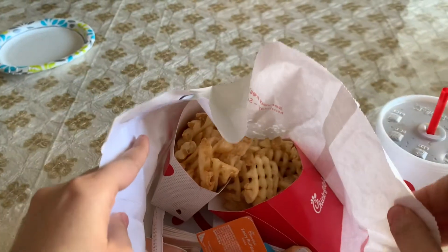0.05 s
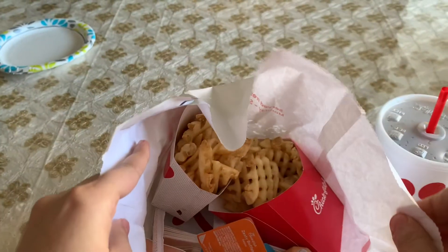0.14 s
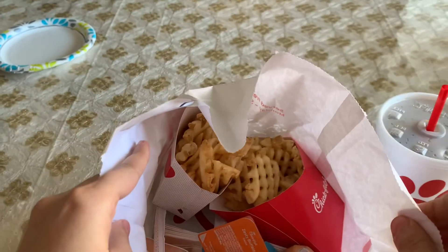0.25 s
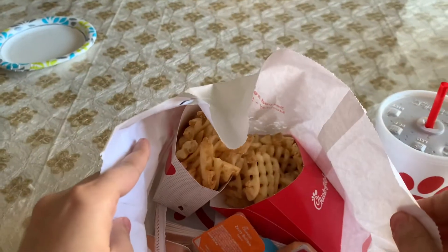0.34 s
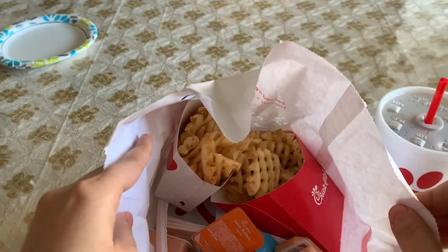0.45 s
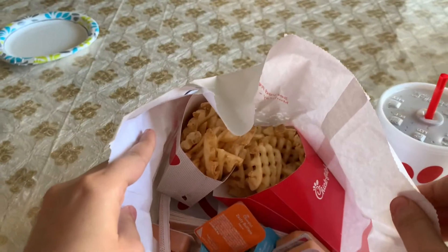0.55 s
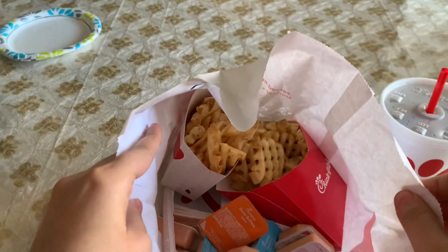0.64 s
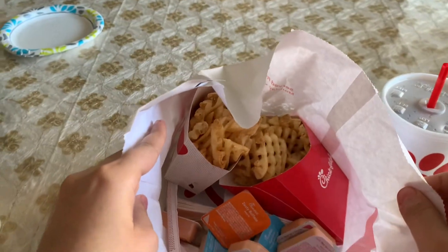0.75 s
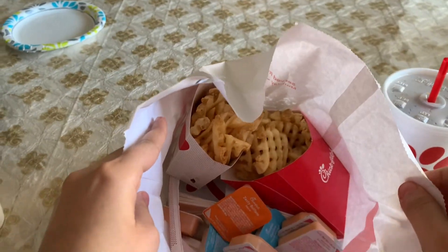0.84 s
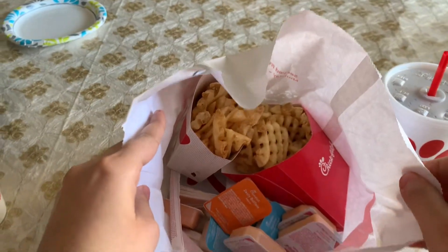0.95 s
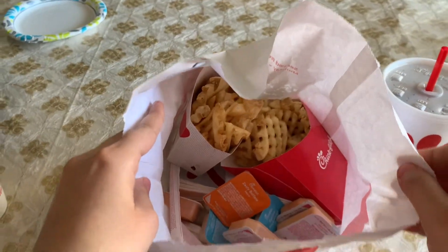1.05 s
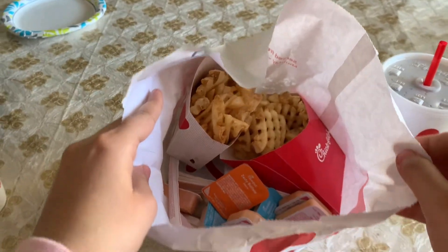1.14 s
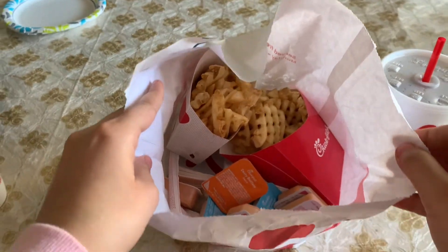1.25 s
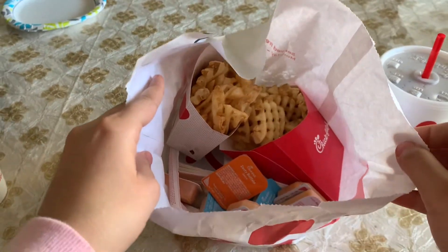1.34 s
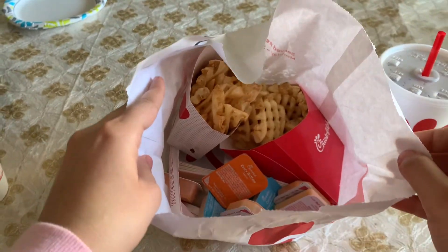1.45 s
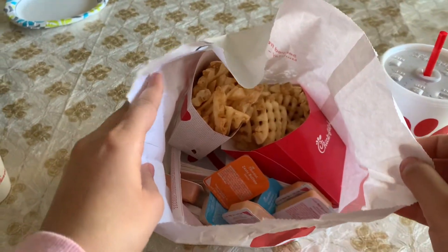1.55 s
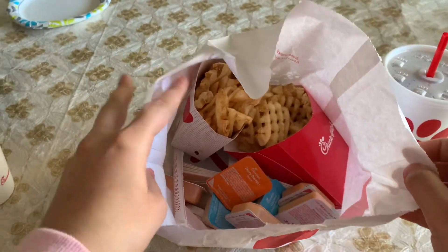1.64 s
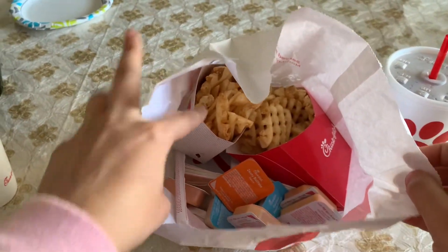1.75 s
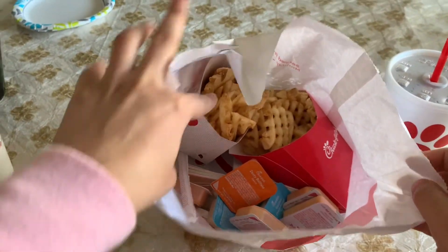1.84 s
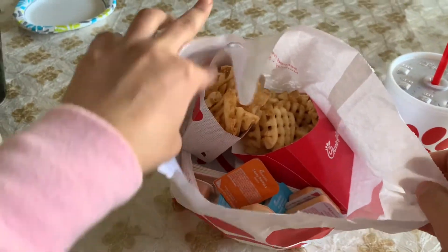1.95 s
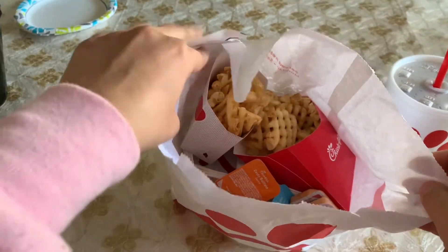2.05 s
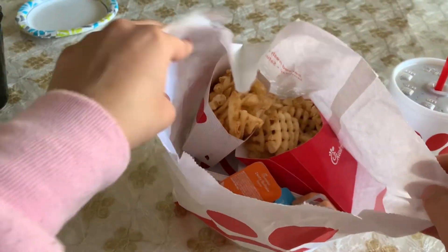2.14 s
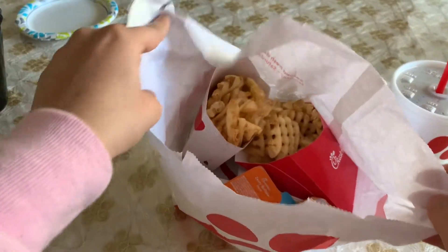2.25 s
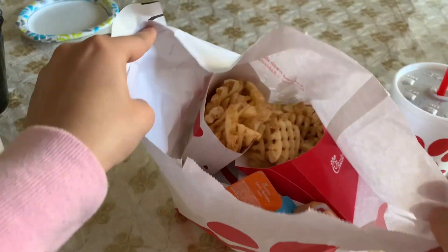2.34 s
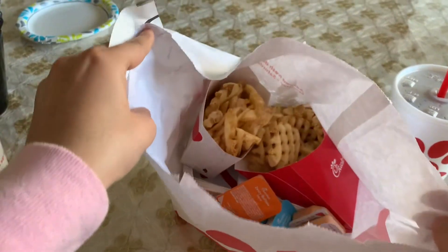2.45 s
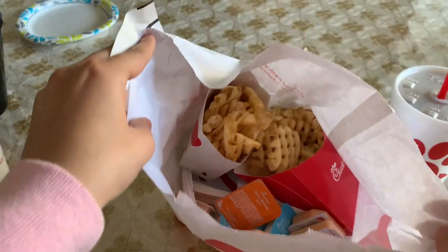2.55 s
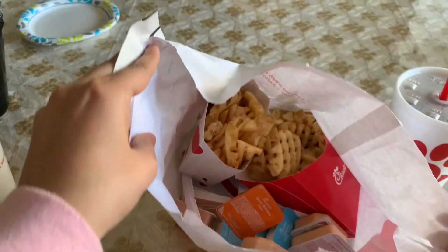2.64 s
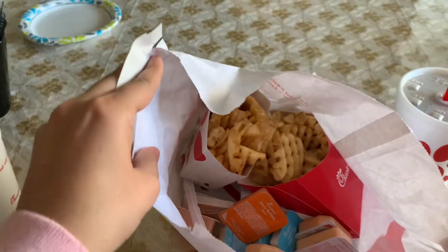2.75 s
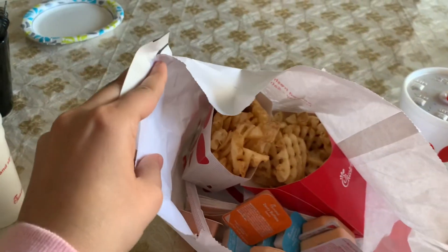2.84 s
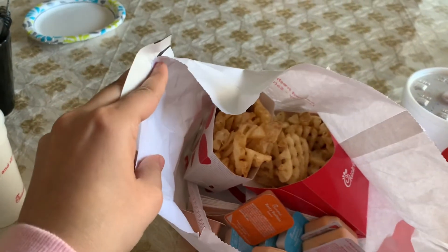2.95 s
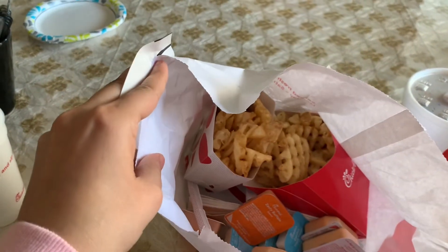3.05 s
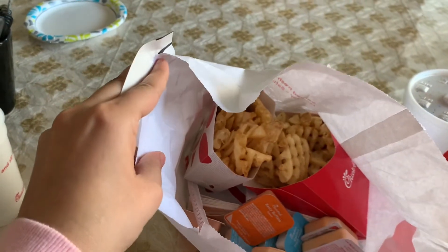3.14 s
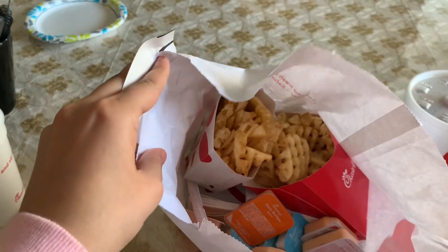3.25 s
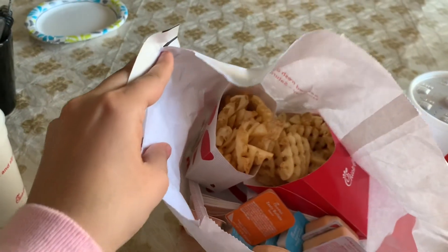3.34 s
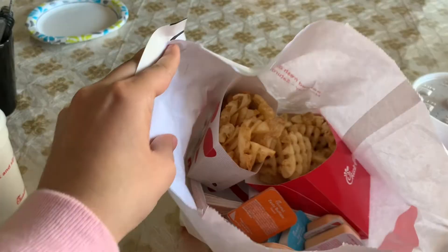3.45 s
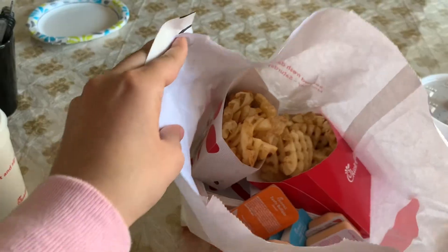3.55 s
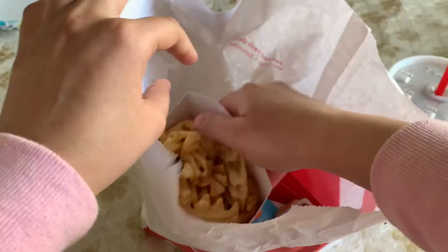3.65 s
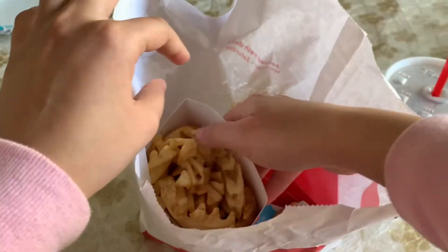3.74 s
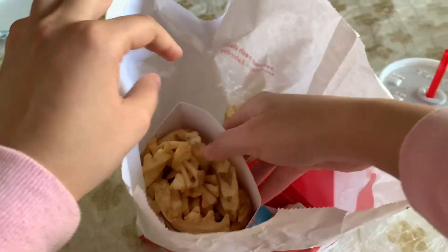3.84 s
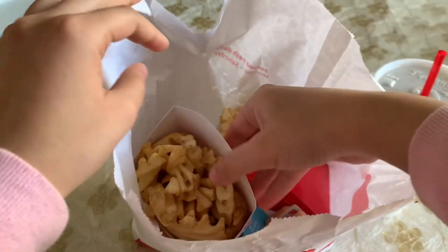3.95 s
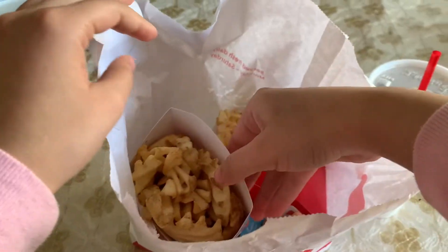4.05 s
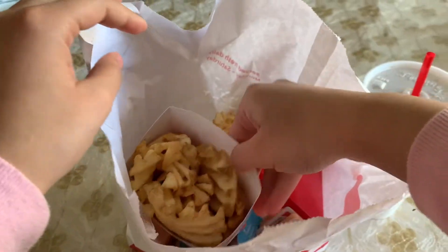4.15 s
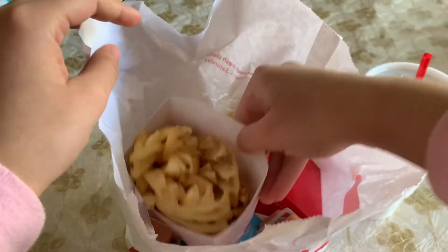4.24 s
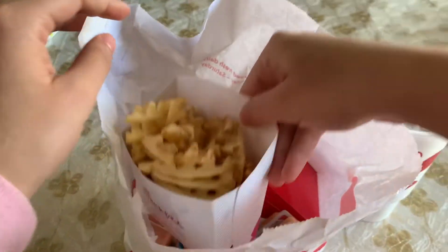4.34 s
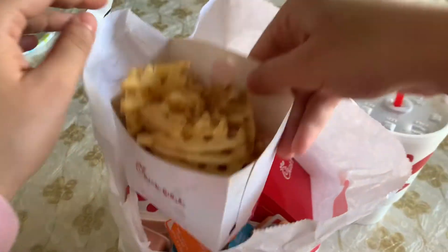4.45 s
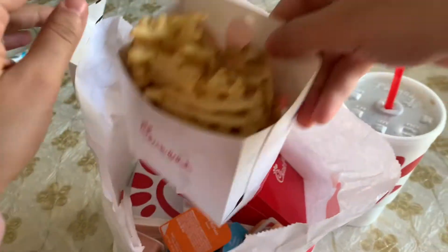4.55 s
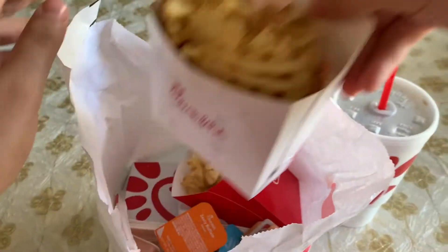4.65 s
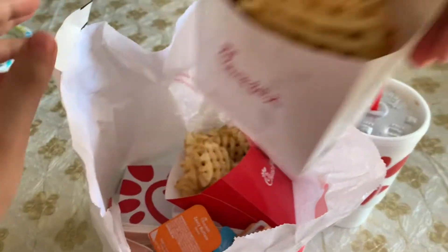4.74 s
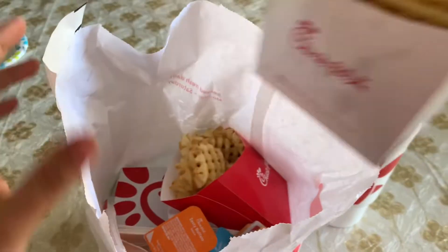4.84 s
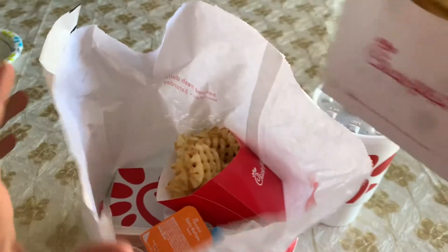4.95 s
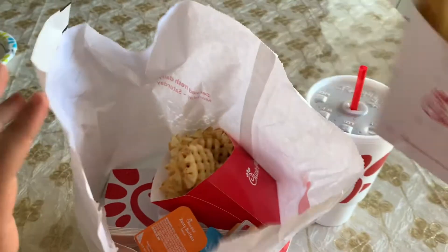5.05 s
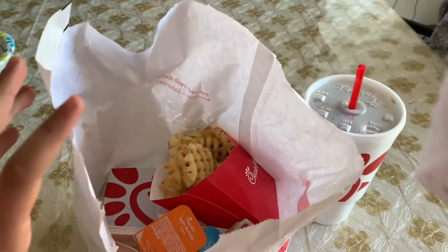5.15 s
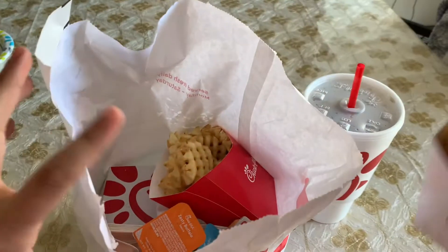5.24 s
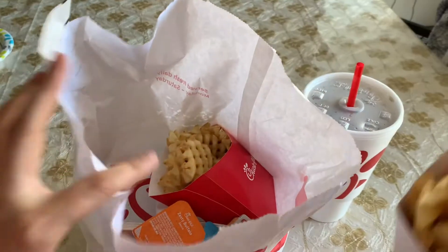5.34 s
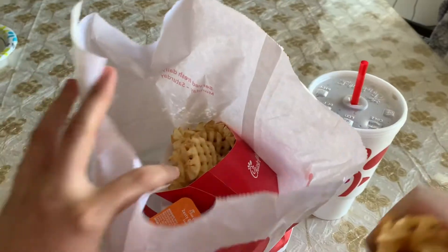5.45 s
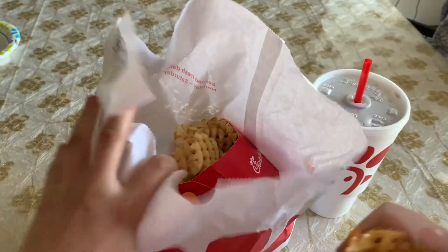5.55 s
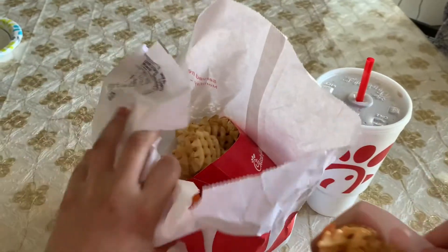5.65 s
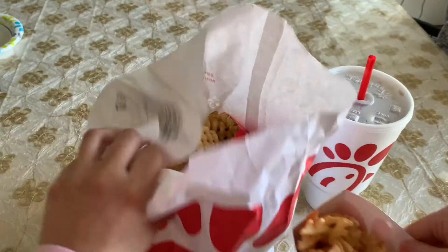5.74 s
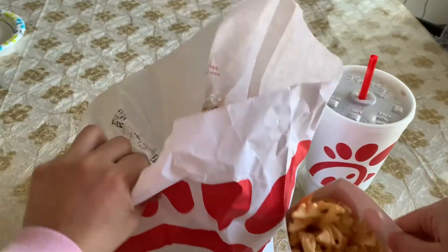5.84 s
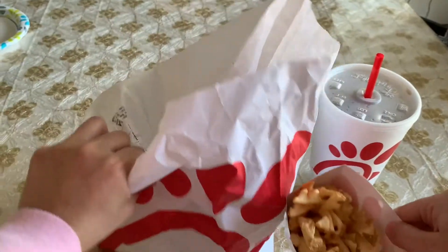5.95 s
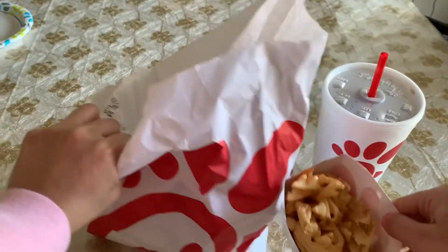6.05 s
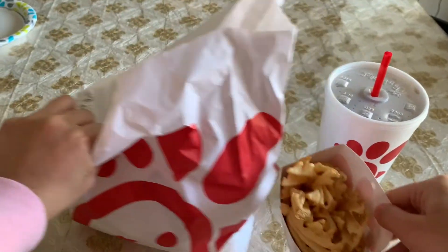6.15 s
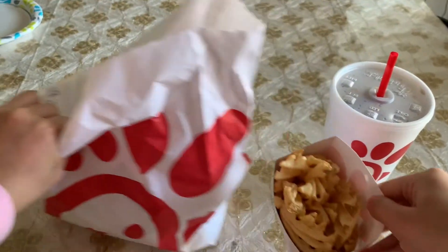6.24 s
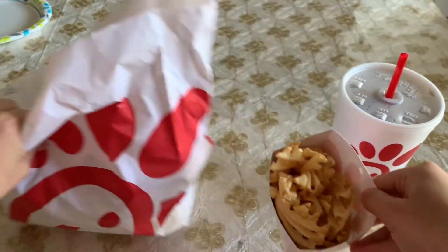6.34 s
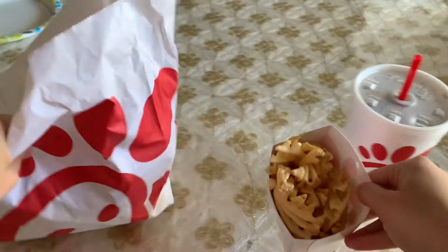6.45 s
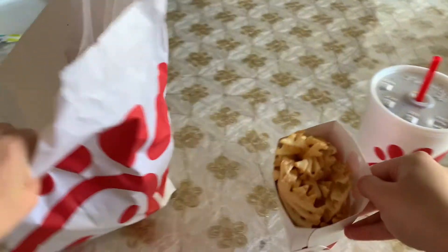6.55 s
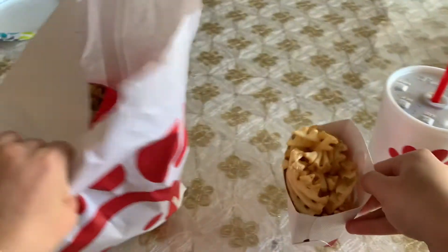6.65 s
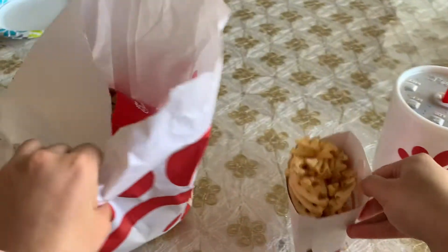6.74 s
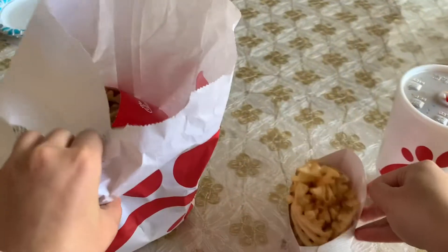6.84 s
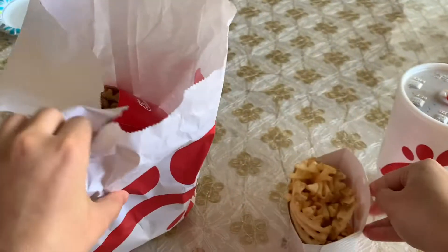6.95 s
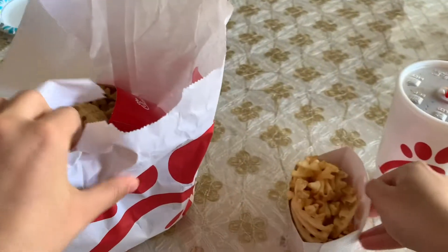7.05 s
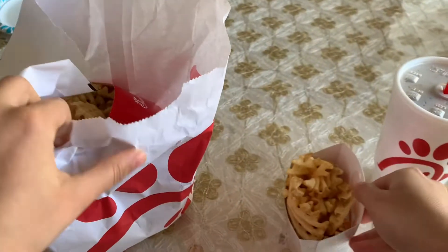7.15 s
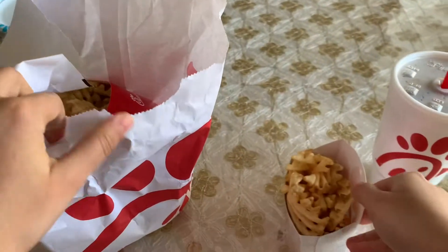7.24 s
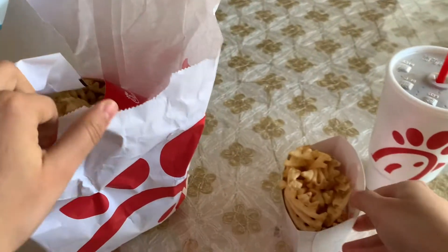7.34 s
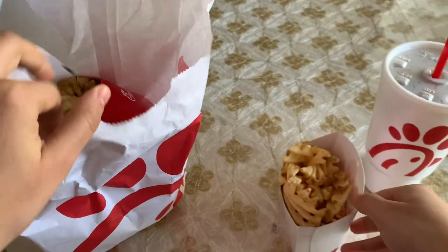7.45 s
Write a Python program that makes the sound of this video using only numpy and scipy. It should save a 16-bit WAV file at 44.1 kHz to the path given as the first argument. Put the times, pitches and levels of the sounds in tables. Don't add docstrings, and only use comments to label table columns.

```python
import sys
import numpy as np
from scipy import signal
from scipy.fft import rfft, irfft, next_fast_len
from scipy.io import wavfile
from scipy.ndimage import map_coordinates

SR = 44100
rng = np.random.default_rng(int(sys.argv[2]) if len(sys.argv) > 2 else 0)


def field_ratio(decibels):
    return 10 ** (np.asarray(decibels, dtype=float) / 20)


def bounce(signal):
    frames = np.transpose(np.atleast_2d(signal))
    limited = np.clip(frames, -1, 1)
    pcm = np.round(limited * 32767).astype(np.int16)
    wavfile.write(sys.argv[1], SR, pcm)


N = 330309

# (frequency [Hz], level [dB])
SHEEN_COLOUR = [(2500, -15), (5000, -7.5), (7500, 3), (9000, 9.5), (11000, 5), (14000, 5), (15700, 0.5),
                (16300, -33)]
# (time [s], peak [dB], boom [Hz])
WALL_THUDS = [(0.358, -35.5, 385), (0.425, -38, 193), (0.501, -32, 287), (0.757, -35.5, 335),
              (0.981, -34.5, 278), (1.149, -40.5, 430), (1.501, -31, 352), (1.87, -21, 297),
              (2.073, -22.5, 346), (2.11, -23, 187), (2.209, -22.5, 332), (2.464, -31, 588),
              (2.811, -27, 220), (3.309, -29, 205), (3.535, -25.5, 305), (3.62, -33, 208), ]
# (time [s], peak [dB], boom [Hz])
CARTON_KNOCKS = [
    (4.031, -36, 320),
    (4.119, -36, 372),
    (4.178, -26, 593),
    (4.238, -29, 314),
    (4.348, -37.5, 515),
    (4.435, -36.5, 416),
    (4.563, -41, 450),
    (4.61, -40, 251),
    (4.644, -43.5, 453),
]
# (time [s], peak [dB], boom [Hz])
BAG_BUMPS = [(4.894, -30, 240), (4.949, -37, 364), (5.278, -36, 225), (5.486, -15, 334),
             (5.541, -30.5, 410), (5.612, -26, 371), (5.657, -20.5, 264), (5.697, -17.5, 350),
             (5.905, -14.5, 350), (6.035, -20.5, 340), (6.412, -19, 457), (6.525, -17, 223),
             (6.577, -24, 219), (6.694, -27.5, 330), (6.761, -24.5, 355), (6.843, -29, 442),
             (7.136, -34.5, 360)]
# (time [s], peak [dB], boom [Hz])
MORE_BUMPS = [(0.453, -41.0, 230.0), (0.857, -44.0, 320.0), (0.881, -42.0, 220.0), (1.451, -38.0, 220.0),
              (1.475, -33.0, 360.0), (1.63, -40.0, 380.0), (1.703, -33.0, 330.0), (1.736, -31.0, 430.0),
              (1.841, -34.0, 450.0), (1.895, -22.0, 350.0), (2.276, -37.0, 170.0), (2.515, -35.0, 460.0),
              (2.554, -42.0, 360.0), (2.603, -35.0, 330.0), (2.9, -40.0, 270.0), (3.232, -47.0, 310.0),
              (3.409, -40.0, 350.0), (3.505, -36.0, 470.0), (3.666, -42.0, 470.0), (4.053, -38.0, 330.0),
              (4.461, -48.0, 360.0), (4.923, -32.0, 320.0), (5.312, -29.0, 340.0), (5.739, -17.0, 410.0),
              (5.78, -23.0, 330.0), (5.857, -23.0, 450.0), (6.16, -31.0, 250.0), (6.186, -31.0, 310.0),
              (6.276, -31.0, 320.0), (6.339, -27.0, 460.0), (6.467, -22.0, 230.0), (6.723, -30.0, 430.0),
              (6.973, -37.0, 430.0), (7.028, -39.0, 360.0), (7.209, -39.0, 250.0), (7.393, -33.0, 380.0)]


def unit(x):
    return x / np.sqrt(np.mean(x ** 2, axis=-1, keepdims=True) + 1e-20)


def along(points, hz):
    f, v = np.transpose(points)
    return np.interp(np.log(hz + 1), np.log(f + 1), v)


def curves(rows, s):
    t, *cols = np.transpose(rows)
    return [np.interp(s, t, c) for c in cols]


def wobble(rate):
    knots = rng.standard_normal(int(N * rate / SR) + 4)
    return map_coordinates(knots, [np.arange(N) * rate / SR])


def swells(t, start, hold, db, rise, fall):
    u = t[:, None] - start
    level_db = db - rise * np.clip(-u, 0, None) - fall * np.clip(u - hold, 0, None)
    return np.sum(field_ratio(2 * level_db), 1)


def filtered(x, response):
    m = next_fast_len(N + SR // 4)
    return irfft(rfft(x, m) * response(np.fft.rfftfreq(m, 1 / SR)), m)[..., :N]


def ports(pair, f, lag_s):
    # (frequency [Hz], left-right likeness [0-1])
    likeness = [(60, 0.9), (400, 0.99), (800, 0.55), (2000, 0.59), (6000, 0.19)]
    turn = np.arccos(np.clip(along(likeness, f), -1, 1)) / 2
    mid = pair[0] * np.cos(turn)
    side = pair[1] * np.sin(turn)
    return np.array([mid + side, (mid - side) * np.exp(-2j * np.pi * f * lag_s)])


def rush(shape, lag_s):
    f = np.fft.rfftfreq(N, 1 / SR)
    noise = rfft(rng.standard_normal((2, N)))
    return unit(irfft(ports(noise, f, lag_s) * shape(f), N))


def appliance():
    # (frequency [Hz], level [dB per Hz])
    motor_colour = [(30, -38), (58, -4), (90, -4), (110, 5.5), (130, 0), (150, -38), (600, -100)]
    # (start [s], hold [s], peak [dB])
    tone_swells = [
        (.52, .11, -52),
        (4.66, .075, -48),
        (4.8, .04, -54),
    ]
    hum_db, tone_hz = -61.5, 113
    t = np.arange(N) / SR
    drift_db = 2.5 * wobble(6)
    tone_level = np.sqrt(swells(t, *np.transpose(tone_swells), 260, 260))
    tone = tone_level * np.sin(2 * np.pi * tone_hz * t)
    hum = field_ratio(hum_db + drift_db) * rush(lambda f: field_ratio(along(motor_colour, f)), 0)
    return hum + tone


def handling():
    # (time [s], rustle [dB])
    pressure = [(0, -50), (.33, -57.5), (1.31, -58.5), (1.55, -49), (2.0, -44.5), (2.33, -47), (2.8, -49),
                (3.13, -66), (3.4, -47), (3.93, -64), (4.41, -66), (4.79, -74), (5.21, -64), (5.5, -33),
                (6.12, -39), (6.3, -44.5), (6.8, -36.5), (7.1, -52.5)]
    # (start [s], hold [s], rustle [dB], sheen over it [dB])
    strokes = [(0.0, .04, -50, -15), (.07, .11, -51, -16), (.84, .07, -60, 4), (1.48, 0.036, -56.5, 0),
               (1.594, 0.36, -48, -5), (1.861, 0.052, -35.5, -8), (2.079, 0.13, -34.5, -7.5),
               (2.48, 0.067, -47, -13), (2.658, 0.012, -50.5, -5), (2.825, 0.041, -50.5, -12),
               (3.202, 0.033, -58.5, -2), (3.32, .02, -51, -3), (3.475, .075, -44, -1),
               (3.616, 0.092, -51.5, -4), (4.03, .12, -54, -3), (4.18, 0.085, -49, 4), (4.27, .05, -54, 9),
               (4.325, .022, -52, 11), (4.97, .09, -56, -14), (5.23, .06, -57, 1.5),
               (4.905, 0.028, -39, -4), (5.3, .05, -47, -2), (5.47, 0.015, -43, 8), (5.547, 0.037, -33, -8),
               (5.695, 0.048, -31, -4.5), (5.835, 0.16, -29, -8.5), (6.03, 0.24, -42, -11),
               (6.379, 0.089, -32.5, -12), (6.53, 0.054, -37, -5), (6.693, .07, -47, -3),
               (7.05, .17, -55, 3), (7.27, .21, -52, 3), (7.37, .05, -46, 5), (3.738, 0.14, -63, 2.5)]
    rise, fall, sheen_fall = 480, 180, 480
    rest_sheen_db, sheen_grows = -12, 1.35
    boom_db, boom_grows = -3.2, .84
    air_db = -80
    flex_db, flex_rise, flex_fall = -17, 247, 130

    def law(x_db, at_db, grows):
        return field_ratio(2 * (at_db - 45 + grows * (x_db + 45)))

    t = np.arange(0, N / SR, .002)
    start, hold, db, sheen_db = np.transpose(strokes)
    rest_db, = curves(pressure, t)
    rustle = field_ratio(2 * rest_db) + swells(t, start, hold, db, rise, fall)
    rustle_db = 10 * np.log10(rustle)
    sheen = law(rest_db, rest_sheen_db, sheen_grows) + field_ratio(2 * air_db)
    sheen += swells(t, start, hold, db + sheen_db, rise, sheen_fall)
    s, thud_db, _ = np.transpose(WALL_THUDS + CARTON_KNOCKS + BAG_BUMPS + MORE_BUMPS)
    boom = law(rustle_db, boom_db, boom_grows)
    boom += swells(t, s, 0, thud_db + flex_db, flex_rise, flex_fall)
    return np.transpose([t, rustle_db, 10 * np.log10(boom), 10 * np.log10(sheen)])


def mode(f, hz, width):
    return 1j * f * width / (hz * hz - f * f + 1j * f * width)


def bag(f):
    # (frequency [Hz], width [Hz], level [dB])
    resonances = [
        (204, 183, 0),
        (359, 156, 5),
        (456, 168, 2),
    ]
    return sum((-1) ** k * field_ratio(db) * mode(f, hz, w) for k, (hz, w, db) in enumerate(resonances))


def slide():
    # (frequency [Hz], level [dB])
    rub_colour = [(250, -6), (800, -4), (1600, -2.5), (3000, -6.5), (5000, -9), (7500, -12.5),
                  (10500, -46.5)]
    # (frequency [Hz], level [dB])
    table_colour = [(25, -28), (55, 6.5), (120, 5.5), (300, -60.5)]
    rustle_db, boom_db, sheen_db = curves(handling(), np.arange(N) / SR)
    grip = wobble(30)
    rub = field_ratio(rustle_db - 5.0 + 4.45 * grip) * rush(lambda f: field_ratio(along(rub_colour, f)), 0.0002)
    hiss = field_ratio(sheen_db - 3.0 + 1.4 * grip) * rush(lambda f: field_ratio(along(SHEEN_COLOUR, f)), 0.0001)
    boom = field_ratio(boom_db - 4.5 + 3.5 * wobble(30)) * rush(bag, 6e-5)
    thump = field_ratio(boom_db - 11.0 + 3.5 * wobble(22)) * rush(lambda f: field_ratio(along(table_colour, f)), 0)
    return rub + hiss + boom + thump


def add(out, s, waves):
    start = np.round(s * SR).astype(int)[:, None]
    at = (start + np.arange(waves.shape[-1])).clip(0, N - 1)
    out += [np.bincount(at.ravel(), w.ravel(), N) for w in waves]
    return out


def bursts(rise_s, size, lag_s=.00015):
    u = np.arange(size) / SR / rise_s[:, None] - 5
    f = np.fft.rfftfreq(size, 1 / SR)
    luck = rng.standard_normal((len(u), 2, size + 1)).swapaxes(0, 1)
    steepness = np.where(u < 0, 1.6, -1)
    swell = np.exp(steepness * (u * u / (abs(u) + 3.1)) * np.sign(u))
    pair = rfft(luck[..., 1:] * swell)
    lags = lag_s * (1 + luck[0, :, :1] / 3)
    side = luck[1, :, 0]
    return f, ports(pair, f, lags), side


def shaped(burst, shape, rise_s):
    wave = irfft(burst * shape)
    energy = np.mean(np.sum(wave ** 2, -1), 0)
    return wave * np.sqrt(rise_s * SR / energy)[:, None]


def buckle(s, db, ring_hz, sheen_db, ms, ring_db, pan_db, size):
    # (frequency [Hz], level [dB])
    paper_colour = [(250, -30.5), (800, -3), (1500, -2), (3000, -0.5), (5000, 0.5), (7000, -1.5),
                    (9000, -1), (12000, -56.5), (16300, -46)]
    rise = np.clip(ms - .6, .9, 6) / 2200
    f, burst, side = bursts(rise, size)
    burst = burst * np.exp(-2j * np.pi * 0.0511 * np.sqrt(f))
    hz = ring_hz[:, None]
    ring = 1 + field_ratio(ring_db) * mode(f, hz, 240 + .12 * hz)
    dull = field_ratio(0.4 * np.minimum(sheen_db, 0)[:, None] * np.log2(1 + f / hz))
    wave = shaped(burst, field_ratio(along(paper_colour, f)) * ring * dull, rise)
    wave += field_ratio(sheen_db + 3.24)[:, None] * shaped(burst, field_ratio(along(SHEEN_COLOUR, f)), rise)
    wave *= field_ratio(db + np.outer([.5, -.5], pan_db * side))[..., None]
    return add(np.zeros((2, N)), s - 5 * rise - .0004, wave)


def crackle(count):
    luck = rng.random((count, 3))
    s = luck[:, 0] * N / SR
    rustle_db, _, sheen_db = curves(handling(), s)
    clumps_db = 3 * wobble(35)[(s * SR).astype(int)]
    chance_db = -4 * np.log(luck[:, 1] + 0.09)
    bright_cut_db = .9 * np.clip(sheen_db - rustle_db + 3, 0, None)
    db = rustle_db + clumps_db + chance_db - 6 - bright_cut_db
    ring_hz = 1000 * 7.0 ** luck[:, 2]
    ms = np.full(count, 1.8)
    return buckle(s, db, ring_hz, sheen_db - rustle_db, ms, ring_db=9, pan_db=3, size=512)


def snaps():
    # (time [s], peak [dB], ring [Hz], sheen [dB])
    held_open = [(0.008, -30.0, 860.0, -25.0), (0.075, -33.0, 7800.0, -6.0), (0.084, -21.0, 6270.0, -14.0),
                 (0.137, -44.0, 860.0, -3.0), (0.154, -56.0, 950.0, 0.0), (0.161, -27.0, 3680.0, -8.0),
                 (0.283, -40.0, 7280.0, -10.0), (0.307, -42.0, 3120.0, -36.0),
                 (0.359, -30.0, 1400.0, -40.0), (0.422, -54.0, 990.0, 2.0), (0.454, -32.0, 860.0, -47.0),
                 (0.495, -33.0, 970.0, -56.0), (0.502, -26.0, 860.0, -20.0), (0.543, -34.0, 3770.0, -26.0),
                 (0.602, -31.0, 1420.0, -34.0), (0.701, -39.0, 950.0, -30.0), (0.803, -42.0, 4690.0, -25.0),
                 (0.881, -33.0, 1140.0, -7.0), (0.908, -53.0, 950.0, 10.0), (0.972, -44.0, 2020.0, -24.0),
                 (0.978, -46.0, 1060.0, -42.0), (1.032, -42.0, 930.0, -26.0), (1.059, -35.0, 3450.0, -22.0),
                 (1.149, -23.0, 5920.0, -7.0), (1.324, -41.0, 1460.0, -42.0), (1.361, -46.0, 1100.0, -47.0),
                 (1.365, -41.0, 1080.0, -37.0), (1.384, -40.0, 1420.0, -42.0),
                 (1.419, -38.0, 1360.0, -50.0), (1.457, -35.0, 1400.0, -28.0), (1.476, -38.0, 860.0, -29.0)]
    spread_wider = [(1.502, -28.0, 880.0, -23.0), (1.519, -21.0, 1550.0, -24.0),
                    (1.607, -16.0, 3040.0, -16.0), (1.789, -28.0, 7430.0, -5.0),
                    (1.802, -33.0, 1890.0, -17.0), (1.871, -11.0, 6310.0, -7.0),
                    (1.878, -11.0, 7060.0, -22.0), (1.899, -21.0, 930.0, -22.0),
                    (1.929, -12.0, 6350.0, -17.0), (1.946, -22.0, 3120.0, -15.0),
                    (2.032, -29.0, 6520.0, -13.0), (2.049, -18.0, 6890.0, -8.0),
                    (2.077, -4.0, 6870.0, -8.0), (2.094, -15.0, 6440.0, -12.0),
                    (2.104, -13.0, 5490.0, -12.0), (2.113, -9.0, 6830.0, -10.0),
                    (2.12, -11.0, 6370.0, -13.0), (2.135, -17.0, 6160.0, -17.0),
                    (2.145, -12.0, 6520.0, -15.0), (2.171, -2.0, 7260.0, -19.0),
                    (2.199, -19.0, 4390.0, -12.0), (2.207, -17.0, 6870.0, -6.0),
                    (2.273, -34.0, 1660.0, -18.0), (2.335, -38.0, 860.0, -16.0),
                    (2.378, -30.0, 1980.0, -33.0), (2.422, -27.0, 3210.0, -20.0),
                    (2.444, -23.0, 6960.0, -15.0), (2.465, -18.0, 5770.0, -2.0),
                    (2.473, -24.0, 4290.0, -7.0), (2.505, -29.0, 1100.0, -8.0),
                    (2.555, -34.0, 2130.0, -24.0), (2.57, -27.0, 3190.0, -23.0),
                    (2.599, -29.0, 6270.0, -10.0), (2.65, -14.0, 1870.0, -23.0),
                    (2.66, -31.0, 1400.0, -36.0), (2.674, -33.0, 1380.0, -34.0),
                    (2.784, -35.0, 1160.0, -47.0), (2.81, -18.0, 3210.0, -16.0),
                    (2.855, -23.0, 3210.0, -20.0), (2.886, -28.0, 1870.0, -32.0)]
    reach_in = [(3.163, -43.0, 3700.0, -38.0), (3.184, -27.0, 7800.0, -7.0), (3.229, -41.0, 1640.0, -15.0),
                (3.31, -16.0, 2130.0, -7.0), (3.317, -17.0, 3170.0, -17.0), (3.398, -21.0, 2970.0, -19.0),
                (3.408, -34.0, 1060.0, -38.0), (3.441, -32.0, 2370.0, -31.0), (3.455, -40.0, 2450.0, -19.0),
                (3.502, -32.0, 900.0, -21.0), (3.511, -28.0, 860.0, -8.0), (3.536, -20.0, 4480.0, -6.0),
                (3.621, -20.0, 3980.0, -28.0), (3.667, -28.0, 6070.0, -5.0), (3.742, -41.0, 6850.0, -16.0),
                (3.84, -31.0, 2540.0, -38.0), (3.845, -39.0, 1030.0, -33.0), (4.018, -38.0, 3230.0, -16.0),
                (4.043, -38.0, 2890.0, -10.0), (4.058, -37.0, 4330.0, 0.0), (4.067, -47.0, 5230.0, -2.0),
                (4.121, -38.0, 970.0, -36.0), (4.152, -34.0, 1550.0, -31.0), (4.247, -41.0, 7360.0, -2.0),
                (4.256, -31.0, 3250.0, -25.0), (4.349, -39.0, 6740.0, -8.0), (4.893, -25.0, 7800.0, -18.0),
                (4.903, -29.0, 5380.0, -12.0), (4.91, -19.0, 6760.0, -15.0), (4.945, -22.0, 7260.0, -7.0),
                (5.105, -45.0, 1810.0, -35.0)]
    drag_aside = [(5.309, -26.0, 4410.0, -19.0), (5.331, -17.0, 7020.0, -6.0),
                  (5.348, -26.0, 2990.0, -15.0), (5.389, -26.0, 4200.0, -13.0),
                  (5.397, -22.0, 3620.0, -16.0), (5.41, -22.0, 4870.0, -12.0), (5.442, -24.0, 7260.0, -8.0),
                  (5.465, -9.0, 4950.0, -8.0), (5.472, -10.0, 6630.0, -9.0), (5.489, 1.0, 7240.0, -14.0),
                  (5.524, -18.0, 7800.0, -14.0), (5.535, -14.0, 7800.0, -3.0),
                  (5.544, -15.0, 6420.0, -16.0), (5.556, -8.0, 6870.0, -13.0), (5.57, -8.0, 6850.0, -9.0),
                  (5.583, -12.0, 5060.0, -22.0), (5.599, -16.0, 7800.0, -10.0),
                  (5.603, -10.0, 3270.0, -15.0), (5.612, -15.0, 6610.0, -12.0),
                  (5.628, -19.0, 4160.0, -16.0), (5.662, -14.0, 3010.0, -9.0),
                  (5.679, -16.0, 3340.0, -18.0), (5.704, -19.0, 7360.0, -4.0), (5.716, -20.0, 7800.0, -8.0),
                  (5.73, -22.0, 3060.0, -7.0), (5.737, -12.0, 7690.0, -9.0), (5.754, -19.0, 1100.0, -17.0),
                  (5.766, -21.0, 7410.0, -5.0), (5.773, -17.0, 1160.0, -22.0),
                  (5.795, -18.0, 3750.0, -20.0)]
    crumpling = [(5.811, -21.0, 5530.0, -9.0), (5.828, -11.0, 6960.0, -22.0), (5.833, -18.0, 1010.0, -11.0),
                 (5.845, -15.0, 7170.0, -7.0), (5.851, -6.0, 7080.0, -14.0), (5.871, -18.0, 5340.0, -17.0),
                 (5.886, -13.0, 2630.0, -12.0), (5.891, -6.0, 2630.0, -20.0), (5.905, -5.0, 6590.0, -5.0),
                 (5.926, -15.0, 3730.0, -11.0), (5.931, -7.0, 4410.0, -14.0), (5.951, -11.0, 7540.0, -11.0),
                 (5.961, -13.0, 1140.0, -28.0), (5.973, -19.0, 3620.0, -11.0), (5.979, -6.0, 3420.0, -17.0),
                 (5.991, -23.0, 2020.0, -17.0), (6.006, -20.0, 3470.0, -12.0), (6.018, -7.0, 7800.0, -17.0),
                 (6.033, -14.0, 2150.0, -20.0), (6.048, -16.0, 2520.0, -19.0), (6.07, -12.0, 6800.0, -14.0),
                 (6.08, -20.0, 3170.0, -24.0), (6.097, -19.0, 2610.0, -7.0), (6.12, -20.0, 6240.0, -19.0),
                 (6.132, -12.0, 6780.0, -8.0), (6.17, -14.0, 7000.0, -18.0), (6.187, -26.0, 1140.0, -22.0),
                 (6.208, -23.0, 4390.0, -21.0)]
    opened_again = [(6.277, -28.0, 1290.0, -22.0), (6.336, -29.0, 1250.0, -20.0),
                    (6.35, -18.0, 1720.0, -17.0), (6.364, -26.0, 1140.0, -17.0),
                    (6.382, -17.0, 2430.0, -17.0), (6.387, -9.0, 7750.0, -21.0),
                    (6.392, -20.0, 1310.0, -34.0), (6.406, -18.0, 2020.0, -20.0),
                    (6.413, -7.0, 7670.0, -13.0), (6.422, -13.0, 4260.0, -11.0),
                    (6.445, -18.0, 4930.0, -14.0), (6.452, -16.0, 1790.0, -10.0),
                    (6.507, -24.0, 3170.0, -21.0), (6.525, -15.0, 2480.0, -13.0),
                    (6.531, -17.0, 860.0, -18.0), (6.539, -19.0, 2200.0, -28.0),
                    (6.568, -13.0, 5210.0, -16.0), (6.587, -22.0, 4800.0, -21.0),
                    (6.67, -23.0, 3230.0, -18.0), (6.679, -19.0, 6090.0, -10.0),
                    (6.702, -12.0, 6910.0, -8.0), (6.709, -17.0, 3620.0, -33.0),
                    (6.725, -25.0, 1010.0, -24.0), (6.752, -14.0, 7800.0, -24.0),
                    (6.76, -18.0, 2110.0, -23.0), (6.768, -21.0, 3270.0, -20.0),
                    (6.783, -29.0, 2760.0, -6.0), (6.879, -25.0, 2990.0, -13.0),
                    (6.919, -22.0, 2580.0, -23.0), (6.938, -27.0, 7620.0, -20.0),
                    (7.018, -19.0, 7470.0, -20.0), (7.046, -24.0, 4110.0, -26.0),
                    (7.134, -18.0, 6460.0, -17.0), (7.214, -41.0, 900.0, -32.0),
                    (7.283, -37.0, 5530.0, -11.0), (7.409, -35.0, 3810.0, -8.0),
                    (7.474, -39.0, 6590.0, -10.0)]
    crisp_times = [0.075, 0.137, 0.161, 0.283, 0.307, 0.422, 0.881, 0.908, 1.149, 1.789, 2.145, 2.65, 2.855,
                   3.163, 3.184, 3.511, 5.105, 5.331, 5.442, 5.556, 5.951, 5.979, 6.097, 6.387, 6.768,
                   7.134]
    crisp_ms, crisp_db = 1.5, 2.5
    snap_ms, longer_per_db, late_s = 2.3, .007, .0013
    snap_db, sheen_gain_db = -6, 7.5
    squeeze = .14
    creases = held_open + spread_wider + reach_in + drag_aside + crumpling + opened_again
    s, db, ring_hz, sheen_db = np.transpose(creases)
    crisp = abs(s[:, None] - crisp_times).min(1) < .003
    ms = np.where(crisp, crisp_ms, snap_ms) * np.exp(longer_per_db * (db + 30))
    db = db + snap_db - squeeze * (db + 12) + crisp_db * crisp
    return buckle(s + late_s, db, ring_hz, sheen_db + sheen_gain_db, ms, ring_db=6, pan_db=1.5, size=1024)


def thuds():
    s, db, hz = np.transpose(WALL_THUDS + CARTON_KNOCKS + BAG_BUMPS + MORE_BUMPS)
    rise = np.full(len(s), .002)
    hz = hz[:, None]
    f, burst, _ = bursts(rise, size=4096, lag_s=7e-5)
    boom = (mode(f, hz, 55) + 0.3 * bag(f)) * mode(f, hz, 430)
    wave = shaped(burst, boom, 5 * rise)
    return add(np.zeros((2, N)), s - 4 * rise, wave * field_ratio(db - 8.0)[:, None])


def room(x):
    # (frequency [Hz], decay by 60 dB [s])
    decay = [(200, 0.28), (2000, 0.12), (12000, 0.029)]
    hz, t, z = signal.stft(rng.standard_normal((2, SR // 3)), SR, nperseg=256)
    z = ports(z * field_ratio(-60 * t / along(decay, hz)[:, None]), hz[:, None], 0)
    tail = signal.istft(z, SR, nperseg=256)[1]
    late = np.pad(x, ((0, 0), (180, 0)))
    return signal.fftconvolve(late, tail / np.linalg.norm(tail[0]), axes=1)[:, :N]


def scene():
    paper = snaps() + crackle(count=1900) + thuds()
    return paper + field_ratio(-10) * room(paper) + slide() + appliance()


def thrifty(x, under_db, quiet_db):
    turn = np.array([[1, 1], [1, -1]]) / np.sqrt(2)
    z = signal.stft(turn @ x, nperseg=1024)[2]
    bands = z[:, :512].reshape(2, 32, 16, -1)
    power = np.mean(abs(bands) ** 2, 2)
    middle = power[:, 1:9].mean((0, 1))
    keep = power > np.maximum(middle * field_ratio(2 * under_db), field_ratio(2 * quiet_db))
    keep[:, :11] = True
    z[:, :512] *= np.repeat(keep, 16, 1)
    return turn @ signal.istft(z, nperseg=1024)[1][:, :N]


def low_pass(x):
    return signal.sosfilt(signal.butter(12, 17140, fs=SR, output="sos"), x)


def record(dry):
    # (frequency [Hz], left over right [dB])
    body_lean = [(300, .5), (900, 1.6), (2500, -1.3), (7000, 0)]
    # (time [s], half width [s], level [dB])
    scene_fades = [
        (3.593, 0.022, -22),
        (4.866, 0.034, -20),
    ]
    spread_hz, spread_s, top_hz = 6300, 9 / SR, 16900

    def treble(f):
        return 1 / (1 + (spread_hz / (f + 1)) ** 16)

    def half(f):
        return np.exp(1j * np.pi * np.outer([-1, 1], f * spread_s - 5 / 4))

    def lean(f):
        return field_ratio(np.outer([.5, -.5], along(body_lean, f)))

    port = dry[0] + [[0], [.18]] * dry[1]
    x = filtered(dry, lambda f: (1 - treble(f)) * lean(f))
    x = x + filtered(port, lambda f: treble(f) * half(f) * (f < top_hz))
    t = np.arange(N) / SR
    x = x * field_ratio(sum(db * np.clip(1 - abs(t - s) / w, 0, 1) for s, w, db in scene_fades))
    x = x / (1 + abs(x / .95) ** 4) ** (1 / 4)
    x = thrifty(x, under_db=-16.5, quiet_db=-108)
    return low_pass(x)


dry = scene()
out = record(dry)
bounce(out)
```